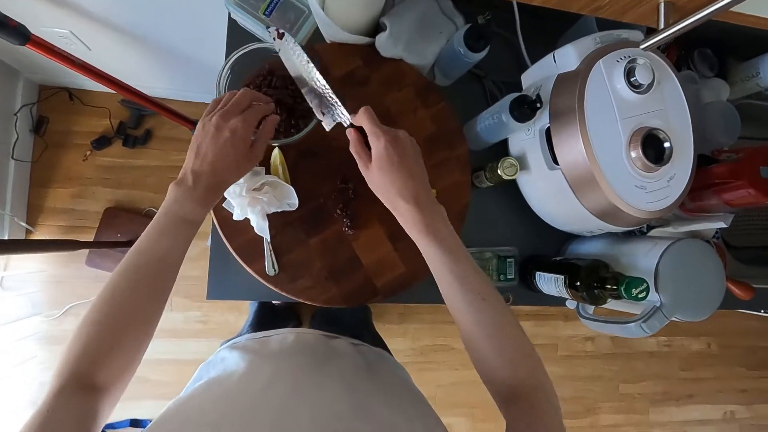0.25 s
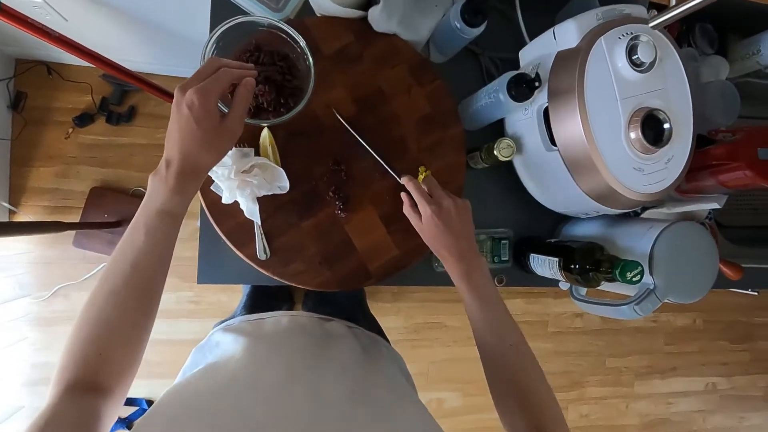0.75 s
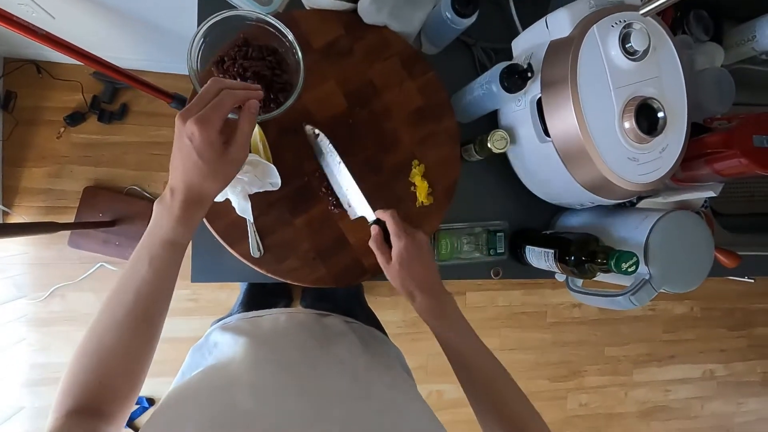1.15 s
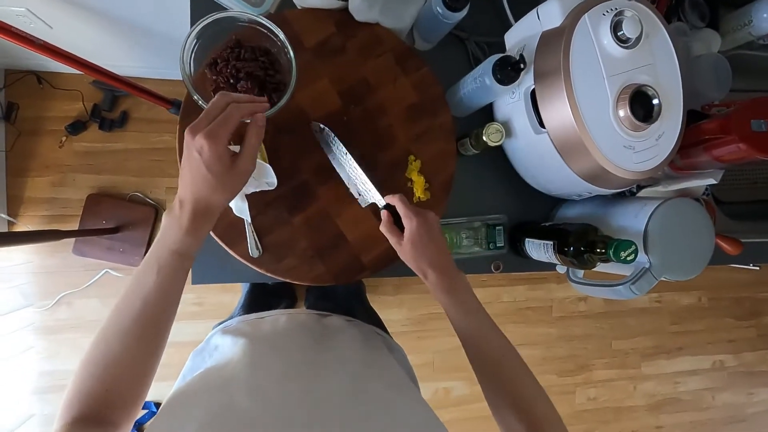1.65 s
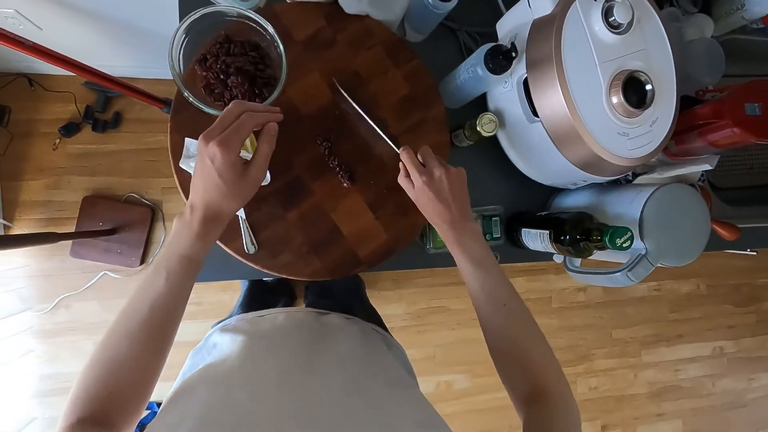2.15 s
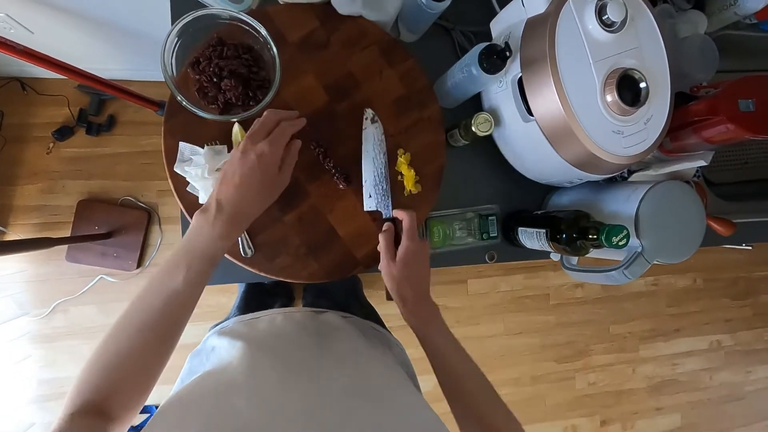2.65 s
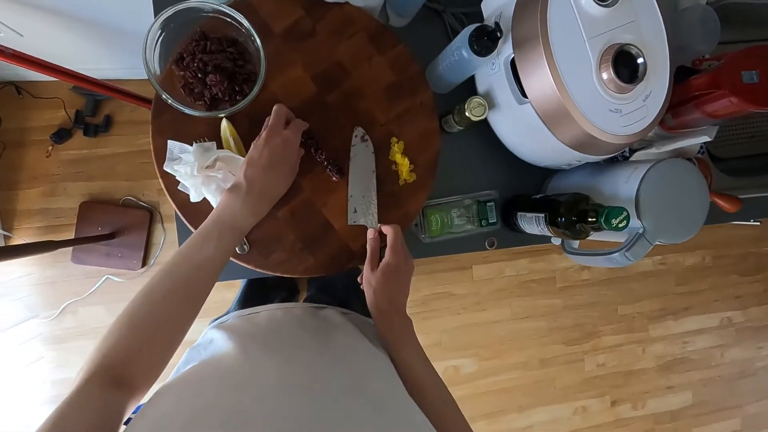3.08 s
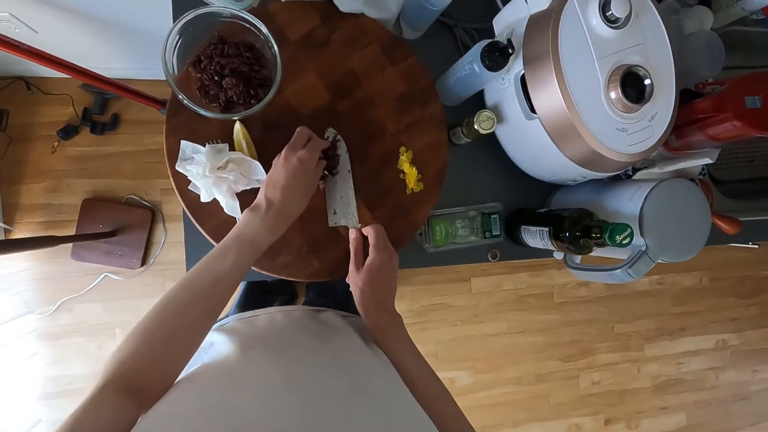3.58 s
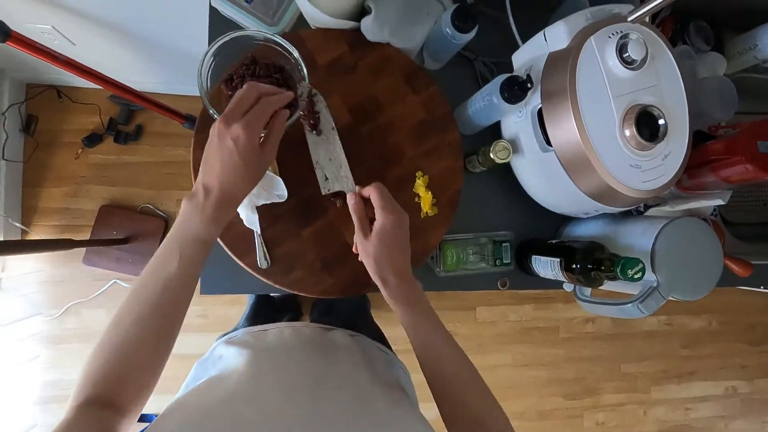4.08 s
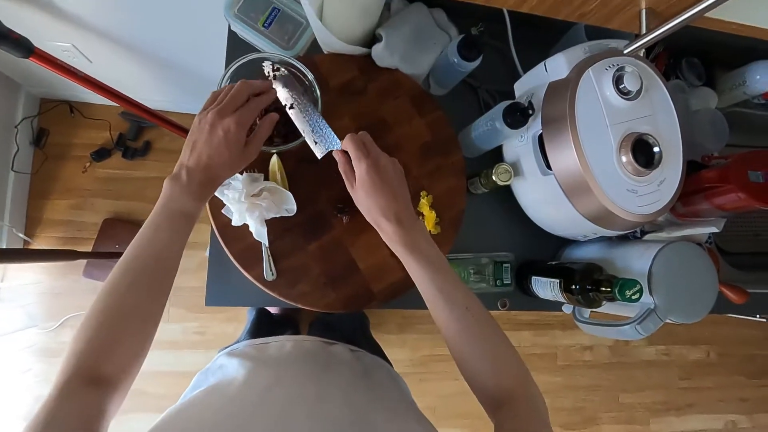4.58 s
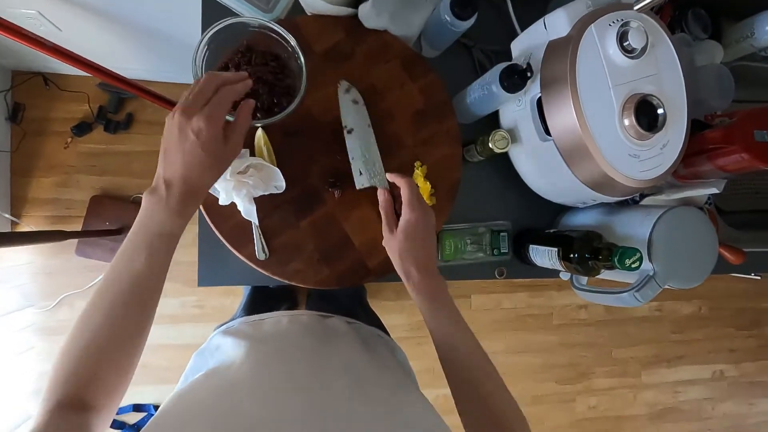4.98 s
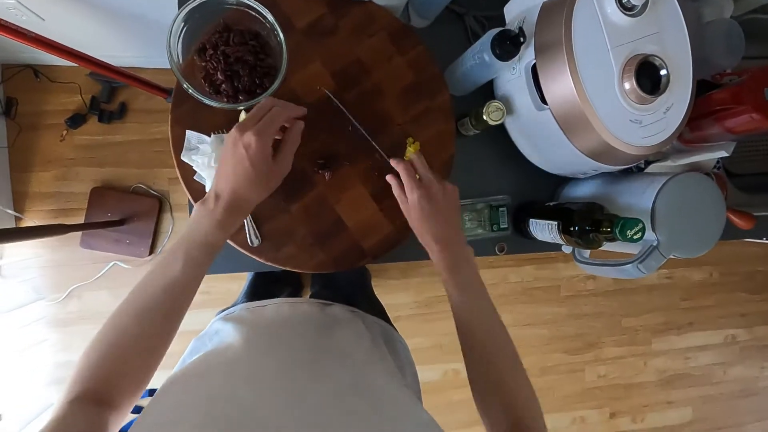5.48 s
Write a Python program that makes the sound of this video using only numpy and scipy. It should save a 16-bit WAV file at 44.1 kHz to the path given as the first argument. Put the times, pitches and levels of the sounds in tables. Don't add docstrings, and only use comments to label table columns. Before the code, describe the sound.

A chef's knife lands on a solid round wooden board, first with a knock and barely audible scrape, then two firm knocks each followed by a longer, metallic slide. Lighter taps follow, then a faint scrape, soft finger brushing and tiny glass bowl ticks, and one last light knock. Small live kitchen, steady low hum, traffic rumble, very faint bird chirps; close stereo head-worn microphone, knife slightly left.

```python
import sys
import numpy as np
from scipy import signal
from scipy.fft import rfft, irfft, next_fast_len
from scipy.io import wavfile
from scipy.ndimage import uniform_filter1d, map_coordinates

SR = 44100
rng = np.random.default_rng(int(sys.argv[2]) if len(sys.argv) > 2 else 0)


def undo_db(level):
    steps = np.asarray(level, float) / 20
    return 10 ** steps


def generate_wav(sig):
    pcm = np.round(np.clip(np.atleast_2d(sig).T, -1, 1) * 32767).astype(np.int16)
    wavfile.write(sys.argv[1], SR, pcm)


N = 252781


def chops():
    land_times = [.7638, 1.4271, 2.2138, 2.764, 2.8857, 5.2861]
    # peak in dB, blow length in seconds, bounce in dB, worktop thump in dB.
    blows = [
        (-23.5, 0.032, -10.5, -3.5),
        (-22.5, 0.027, -8, -8.5),
        (-23.5, 0.036, -14, -5.5),
        (-44.5, 0.0087, -33, -26.5),
        (-27, 0.029, -6.5, -6),
        (-35, 0.035, -6.5, -11),
    ]
    # centre in Hz, width in Hz, level in dB.
    bodies = [
        [(946, 65, 4), (1224, 15, 4), (1680, 35, -5), (2170, 270, -8), (3340, 48, -14.5), (4900, 71, -12),
         (5680, 79, -12), (7070, 28, -26)],
        [(920, 250, 11), (1317, 15.7, 16.5), (1692, 30, 8), (2570, 150, -7), (5880, 22, -20.5), (6660, 27, -4)],
        [(815, 210, 4.5), (1085, 12, 0.5), (1250, 190, 2), (2005, 94, 7), (5730, 11, 0), (6970, 54, -13)],
        [(970, 130, 4), (3000, 120, -8), (5600, 130, -20), (6060, 89, -14)],
        [(1308, 27, 4), (1550, 7.7, 9), (2300, 77, -1.5), (3200, 25, -15), (4940, 28, -21), (5660, 24, -13),
         (7270, 35, -24)],
        [(860, 85, -9), (1437, 50, 6.5), (1810, 46, -11), (2286, 40, 5), (2550, 86, -0.5), (3380, 330, -7),
         (4550, 500, -18), (7240, 180, -12.5)],
    ]
    # frequency in Hz, density in dB per Hz.
    colours = [
        [(88, -66), (150, -18), (928, -9), (1550, -1.5), (1870, -3.5), (2950, -16), (5020, -27), (14000, -53)],
        [(88, -16.5), (150, 10), (725, -10), (1380, 10), (3250, -11.5), (3570, -18.5), (7070, -15.5),
         (14000, -54.5)],
        [(88, -35), (150, -8), (672, -4.5), (1870, 1.5), (3440, -19.5), (5740, -31), (6310, -26), (14000, -49)],
        [(470, -40), (800, 0), (2930, -18.5), (3950, -42), (5380, -16.5), (7000, -50), (9100, -82.5),
         (15400, -120)],
        [(290, -91), (500, 7), (1550, -0.5), (1830, -45), (2220, 6.5), (2820, -5), (6970, -9), (14000, -75)],
        [(410, -40), (700, 2), (2010, -2), (2330, 1), (2850, -13), (7390, -27), (14000, -83)],
    ]
    # modes over the knock in dB, share reaching the walls in dB,
    # flight before the bounce in seconds.
    balances = [(1, -7.5, .019), (0, -5.5, .016), (-4, -5.5, 0.032), (-3, -2, .006), (2, -6, .017),
                (6.5, -5, 0.013)]
    # centre in Hz, width in Hz, level in dB.
    worktop = [(174, 54, 3), (316.5, 33, 4.5), (503, 54, 9.5)]
    bounce_hz = 2515
    near_share = 0.45

    out = np.zeros((2, N + SR))
    t = np.arange(SR // 8) / SR
    for s, blow, body, colour, balance in zip(land_times, blows, bodies, colours, balances):
        db, length, bounce_db, thump_db = blow
        ring_db, room_db, flight = balance
        contact = (1 - np.exp(-t / 0.0006)) * undo_db(-60 * t / max(length, 0.003))
        bounce = burst(np.roll(contact, round(flight * SR)))
        bounce = filtered(bounce, lambda hz: 1 / (1 + 1j * hz / bounce_hz) ** 2)
        force = burst(contact) + undo_db(bounce_db) * bounce

        damped = [(hz, np.hypot(width, 70), level) for hz, width, level in body]
        ring = filtered(filtered(force, modes(damped, widen=0.67)), rolled_off(body))
        ring = undo_db(ring_db) * unit(ring)
        thump = filtered(filtered(force, modes(worktop, widen=0.89)), rolled_off(worktop))
        knock = unit(filtered(force, causal(colour + [(17000, -100)])))
        hit = knock + ring + undo_db(thump_db + 2.5) * unit(thump)
        feed = undo_db(room_db) * (hit - near_share * ring)

        i = round(s * SR)
        out[:, i:i + len(t)] += undo_db(db + 1.0) * np.array([hit, feed]) / np.abs(hit).max()
    return out[:, :N]


def strokes():
    # time in seconds, speed as blade hiss in dB, pressure as board rub in dB.
    motions = [
        [(0.875, -75, -75), (0.887, -66, -88), (0.907, -59, -59.5), (0.935, -57, -58.5), (0.953, -67, -75),
         (0.965, -80, -82)],
        [(1.475, -70.5, -63.5), (1.493, -62.5, -65), (1.527, -40.5, -48.5), (1.549, -38, -47.5),
         (1.601, -35, -56.5), (1.617, -42.5, -45.5), (1.629, -40, -51.5), (1.69, -55, -45.5), (1.7, -69, -58)],
        [(2.235, -61, -54), (2.263, -51, -57), (2.285, -51, -63.5), (2.305, -44, -53), (2.395, -40, -51),
         (2.403, -40.5, -55), (2.411, -44.5, -45.5), (2.443, -43, -39), (2.5, -60, -62)],
        [(3.2, -79, -91), (3.222, -66, -68), (3.236, -56.5, -59), (3.252, -56.5, -66), (3.264, -57.5, -60.5),
         (3.316, -66, -74), (3.37, -76, -64)],
    ]
    # start in seconds, end in seconds.
    contacts = [(.875, .965), (1.475, 1.7), (2.235, 2.5), (3.2, 3.37)]
    # centre in Hz, width in Hz, level in dB.
    first_strokes = [
        [[(5500, 32, 6), (6500, 50, -2), (7720, 32, -3), (8650, 80, -10), (9460, 51, -4), (11200, 30, -11),
         (13500, 31, -21), (14400, 40, -20)], [(4200, 130, -21), (5330, 31, 4), (5910, 33, -3), (7010, 50, -2),
         (8400, 100, -14), (8630, 100, -7), (9450, 50, -13), (11700, 77, -15)]],
        [[(3940, 73, -11.5), (4810, 32, 3), (5090, 24, -14), (5920, 32, -2.5), (6780, 36, -7), (6960, 33, -8),
         (7670, 30, -2), (8600, 30, -12), (10380, 32, -15), (11200, 60, -21)], [(4937, 45, -1), (5990, 120, -6),
         (6800, 59, -10), (7020, 26, -3.5), (7710, 30, -2.5), (8910, 130, -1), (10220, 43, -10),
         (11370, 39, -13.5), (11700, 40.8, -11.5), (12200, 51, -18), (12600, 36, -19.5)], [(3950, 25, -14.5),
         (4750, 37, -0.5), (5800, 86, -0.5), (6660, 59, -9), (7120, 46, -1.5), (7800, 66, -11),
         (8360, 38, -4.5), (11400, 30, -17), (12100, 41, -18), (12800, 110, -23.5), (13700, 36, -25)],
         [(4800, 67.2, -1), (6010, 35, -4), (6980, 60.4, -3.5), (7690, 66, -2), (8230, 25, -7.5),
         (8800, 42, -6), (10140, 26, -15), (11140, 44, -18), (12300, 36, -23), (13600, 33, -24)]],
    ]
    # centre in Hz, width in Hz, level in dB.
    last_strokes = [
        [[(4460, 66, -14), (5290, 36.7, -7.5), (5500, 36, -5.5), (7110, 60, -0.5), (7570, 55, 1.5),
         (8120, 42, -11), (8840, 35, -11), (10000, 62, -12), (10200, 37, -17), (11500, 45, -19)],
         [(4380, 100, -10), (5400, 74, -2), (5610, 88, -7), (6100, 34, -11.5), (6940, 110, -5.5),
         (7800, 80, -1), (8390, 33, -1), (9520, 96, -6.5), (11700, 35, -12), (12200, 32, -14),
         (13500, 37, -25.5)], [(3080, 23, -19), (4480, 120, -4.5), (4600, 25, -11.5), (5470, 30, -14),
         (6370, 35, -8.5), (7120, 81, 1), (7600, 68, 1), (8400, 51, -10.5), (8820, 47, 0), (10100, 32, -11.5),
         (11770, 32, -15)], [(3210, 40, -11.5), (4250, 60, 3.5), (5370, 48, -5), (6970, 36.8, -0.5),
         (7200, 50, 1.5), (7540, 50, -2.5), (8740, 66, -18.5), (9910, 34, -20.5), (11600, 130, -25),
         (14100, 44, -29)], [(3280, 43, -3), (4370, 36, 2), (5390, 67, -9), (5940, 33, 7.5), (7310, 42, -5),
         (7680, 66, -11), (7700, 26, -8), (9880, 32, -20.5), (11970, 47, -22), (14000, 43, -27.5)]],
        [[(3537, 27, 3.5), (4900, 50, -3), (6240, 43, -3), (6800, 60, -4), (7700, 43, -7), (10480, 60, -18),
         (11860, 200, -20)], [(3520, 67, -3), (4850, 90, -8), (6100, 78, -6), (6850, 46, 0), (9800, 53, -13),
         (11770, 120, -14), (13400, 190, -32)]],
    ]
    # centre in Hz, width in Hz, level in dB.
    rubbed = [
        [[(2266, 40, 0)], [(2260, 51, 0)]],
        [[(969, 95, -13), (1677, 23, 1.5), (2490, 60, -18)], [(950, 35, -9.5), (1656, 32, 3),
         (2030, 72, -14.5)], [(924, 66, -5), (1670, 57, 3.5), (2080, 55, -4), (2380, 90, -6.5)]],
        [[(958, 100, -4), (1470, 26, 2), (2245, 54, -2)], [(1530, 31, -7), (1890, 56, -3.5), (2297, 54, 4)],
         [(1520, 70, -10.5), (2210, 112, -6)]],
        [[(2370, 140, 0)], [(2170, 120, 0)]],
    ]
    # moment of each set in seconds,
    # tilt of the hiss in dB per octave, hiss over the modes in dB.
    slides = [([0.79, 0.85], 4, 2.2), ([1.52, 1.565, 1.61, 1.665], 1, -3),
              ([2.265, 2.314, 2.365, 2.425, 2.48], 0.79, -2), ([3.26, 3.33], -7, -3.5)]
    rub_levels = [-9, -10, -6, 0]
    # frequency in Hz, density in dB per Hz.
    fibres = [(1800, -51.5), (2600, -14), (4500, -9), (6200, -4.5), (8000, 0), (9500, -7.5), (13500, -20.5),
              (15600, -31.5)]
    # frequency in Hz, density in dB per Hz.
    rub_colour = [(500, -70.5), (800, -25.5), (1500, 16), (2600, 12.5), (4000, -47)]
    lift_s = 0.016

    out = np.zeros(N)
    table = zip(motions, contacts, first_strokes + last_strokes, rubbed, slides, rub_levels)
    for rows, (start, end), blade, board, (moments, tilt_db, hiss_db), rub_db in table:
        part = slice(round(start * SR) - SR // 10, round(end * SR) + SR // 10)
        speed_db, press_db = [curve[part] for curve in curves(rows)]
        t = np.arange(N)[part] / SR
        touch = np.clip(np.minimum(t - start, end - t) / lift_s + 1, 0, 1) ** 2
        grains = patches((len(t),), patchy_db=2.5)

        turns = [np.sqrt(np.interp(t, moments, only)) for only in np.eye(len(moments))]
        blade_ring = sum(gain * sung(grains, rings) for gain, rings in zip(turns, blade))
        hiss = filtered(grains, lambda hz: undo_db(along(fibres, hz) + tilt_db * np.log2(hz + 1)))
        steel = blade_ring + undo_db(hiss_db) * unit(hiss)
        board_ring = sum(gain * sung(grains, rings) for gain, rings in zip(turns, board))
        rub = filtered(grains, lambda hz: undo_db(along(rub_colour, hz)))
        wood = board_ring + undo_db(rub_db) * unit(rub)
        out[part] += touch * (undo_db(speed_db - 1.0) * unit(steel) + undo_db(press_db - 1.5) * unit(wood))
    return out


def ticks():
    # start in seconds, peak in dB, contact length in seconds.
    touches = [
        (0.243, -51.5, 0.029),
        (1.43, -43.5, 0.028),
        (2.388, -31.5, 0.049),
        (2.437, -40.5, 0.086),
        (2.887, -42.5, 0.012),
        (2.903, -43.5, 0.013),
        (4.55, -54.5, 0.02),
        (4.836, -57.5, 0.035),
        (5.288, -65, 0.026),
    ]
    # centre in Hz, width in Hz, level in dB.
    rung = [
        [(5870, 170, -17), (6800, 460, 8), (6980, 37, 17), (8450, 200, -7), (11800, 200, -18),
         (12100, 200, -17)],
        [(1680, 12, 0), (1770, 37, -13)],
        [(7140, 81, -0.5), (7220, 160, -15.5)],
        [(916, 23, 0)],
        [(2260, 20, 3.5), (3330, 21, 10), (4640, 10, 4), (5400, 27, -7), (5900, 20, 8), (6770, 21, 5.5),
         (7060, 18, 4), (8080, 180, -6), (11800, 460, -16)],
        [(1200, 20, 19), (1490, 10, 21.5), (2390, 20, 3), (3280, 9.9, 4), (4700, 11, 4)],
        [(5930, 200, -7), (7100, 90, -2.5), (7600, 43, 4), (8800, 130, -8), (11500, 900, -25)],
        [(4930, 590, -6.5), (5940, 180, 1), (6540, 590, -14), (6950, 14, 4), (11700, 900, -31)],
        [(7100, 25, 1), (7650, 40, -3)],
    ]
    out = np.zeros(N + SR)
    t = np.arange(SR // 3) / SR
    for (s, db, length), rings in zip(touches, rung):
        force = burst(t / length * undo_db(-60 * t / length))
        resonance, rolloff = modes(rings, widen=1), rolled_off(rings)
        ring = filtered(force, lambda hz: resonance(hz) * (1j * hz / (4000 + 1j * hz)) ** 2 * rolloff(hz))
        i = round(s * SR)
        out[i:i + len(t)] += undo_db(db + 3.3 * wobble(120)[:len(t)]) * ring / np.abs(ring).max()
    return out[:N]


def fingers():
    # loudest moment in seconds, level in
    # dB, rise in seconds, fall in seconds.
    brushes = [(.77, -68, .002, 0.068), (2.89, -73.5, .002, 0.2), (3.4, -77, 0.19, .25),
               (3.8, -88.5, 0.091, 0.14), (4.55, -74, 0.054, 0.047), (4.845, -93, .05, .05),
               (5.292, -70.5, .002, 0.093), (5.73, -77, .03, .03)]
    # frequency in Hz, density in dB per Hz.
    skin_colour = [(3000, -24), (6000, 0.5), (8500, -3.5), (10000, -10.5), (12500, -11), (13200, -19),
                   (14500, -71)]
    fade_db = 18.5
    skin = unit(filtered(rng.standard_normal(N), lambda hz: undo_db(along(skin_colour, hz))))
    skin = skin * undo_db(1.2 * wobble(64))
    out = np.zeros(N)
    for s, db, rise, fall in brushes:
        out += undo_db(db - fade_db * np.abs(arch(s, rise, fall))) * skin
    return out


def ears(x):
    # frequency in Hz, left over right in dB.
    lean = [(200, -1), (700, 0.5), (1300, 2.5), (2600, 1), (5000, 1), (8000, 4), (10000, 0.9), (13000, 1.5)]
    # frequency in Hz, share of the direct sound.
    reflection = [(500, 0.18), (1200, 0.13), (3300, 0.34), (5500, .2), (8000, 0.056), (10000, .1),
                  (13000, 0.51)]
    delays = np.array([[0.0009], [0.0013]])

    def response(hz):
        echo = 1 + along(reflection, hz) * np.exp(-2j * np.pi * hz * delays)
        return undo_db(along(lean, hz) * [[0.5], [-0.5]]) * echo
    return filtered(x, response)


def kitchen(x):
    # frequency in Hz, t60 in seconds.
    decay = [(200, 0.15), (1000, 0.45), (4000, 0.47), (8000, 0.36), (14000, 0.26)]
    hz, t, z = signal.stft(rng.standard_normal((2, SR // 2)), SR, nperseg=256)
    a, b = signal.istft(z * undo_db(-60 * t / along(decay, hz)[:, None]), SR, nperseg=256)[1]
    tail = rfft(np.array([a + 0.75 * b, a - 0.08 * b]))
    near, wide = (uniform_filter1d(np.abs(tail) ** 2, size=k, axis=1) for k in (12, 300))
    tail = irfft(tail * np.sqrt(np.abs(wide / near)))
    tail = tail * np.clip(np.linspace(4, -1, tail.shape[1]), 0, 1) ** 2
    late = np.pad(x, (130, 0))[None]
    return signal.fftconvolve(late, tail / np.linalg.norm(tail[0]), axes=1)[:, :N]


def bird():
    # top of the arch in seconds, climb in seconds, fall in seconds, top in Hz, level in dB.
    notes_sung = [(.541, 0.0066, 0.0046, 4700, -80), (.552, 0.02, 0.023, 3700, -84.5),
                  (.607, 0.0077, 0.012, 3850, -83), (2.804, .003, 0.019, 3900, -84),
                  (3.66, .003, 0.028, 4400, -86), (4.8, .035, .003, 4900, -87.5),
                  (4.823, 0.015, 0.016, 4400, -72.5), (4.867, 0.013, 0.013, 3660, -74),
                  (4.893, 0.012, 0.002, 5000, -80), (4.924, 0.0069, .004, 3700, -82)]
    rest_hz = 3300
    out = np.zeros(N)
    t = np.arange(N) / SR
    for s, climb, fall, top_hz, db in notes_sung:
        hz = top_hz - (top_hz - rest_hz) * np.minimum(((t - s) / max(climb, fall)) ** 2, 1.2)
        half = 0.6 * (climb + fall)
        swell = np.clip(1 - arch(s + (fall - climb) / 2, half, half) ** 2, 0, 1)
        out += swell * undo_db(db + 8.5 + 1.8 * wobble(150)) * np.sin(2 * np.pi * np.cumsum(hz) / SR)
    return out


def hum():
    # frequency in Hz, width in Hz, level in dB.
    motor_lines = [(112.8, 5, -57.5), (150.76, 1.97, -55.5), (228.4, 8.24, -57.5), (299.3, 7.3, -56),
                   (331.2, 8.86, -61), (357.5, 3.36, -58.5), (421, 4.3, -64.5)]
    t = np.arange(N) / SR
    out = np.zeros(N)
    for hz, width, db in motor_lines:
        drift = 2 * np.pi * (hz * t + np.cumsum(0.2862 * width * wobble(6)) / SR + rng.random())
        fuzz = unit(filtered(rng.standard_normal(N), modes([(hz, width, 0)], widen=0.48)))
        out += undo_db(db) * unit(np.sqrt(2) * np.sin(drift) + 0.0064 * width ** 2 * fuzz)
    return filtered(out, rolled_off(motor_lines))


def street():
    # time in seconds, effort in dB.
    load = [(0, -58), (.14, -50.5), (1.0, -50), (1.43, -48.5), (1.72, -49.5), (1.86, -52.5), (2.3, -51),
            (2.7, -51.5), (3.05, -50.5), (3.4, -50.5), (4.1, -52), (4.9, -50.5), (5.35, -52.5),
            (5.73, -54.5)]
    # time in seconds, tyre level in dB.
    nearness = [(0, -70), (.9, -64), (1.8, -72.5), (2.4, -61.5), (2.75, -70.5), (3.3, -64.5), (4.6, -62),
                (5.3, -58), (5.73, -59.5)]
    # frequency in Hz, density in dB per Hz.
    deep = [(11, -49), (18, -21.5), (43, -2.5), (75, -5), (98, -29.5), (160, -120)]
    # frequency in Hz, density in dB per Hz.
    engine = [(45, -55.5), (65, 3), (90, 20), (108, 14.5), (125, 6), (140, -51)]
    # frequency in Hz, density in dB per Hz.
    tyres = [(600, -120), (780, -4), (1000, 7), (1200, -9), (1750, -12), (2300, -19.5), (3000, -120)]
    # frequency in Hz, density in dB per Hz.
    still_air = [(115, -21), (170, -3.5), (223, -5), (307, -3.5), (391, -9), (560, -11.5), (640, -14.5),
                 (1750, -22), (2410, -33), (7600, -48), (8800, -58), (10000, -84.5), (12500, -85),
                 (13300, -120)]
    # centre in seconds, half length in seconds, firing rate in Hz, level in dB.
    surges = [(0.572, 0.092, 92, -51), (1.493, 0.13, 42, -45.5), (2.576, 0.17, 84.3, -52),
              (2.973, 0.071, 88, -55.5), (4.881, 0.078, 106.2, -48), (5.42, 0.21, 96.8, -44),
              (5.4, 0.12, 59, -49)]
    air_db, air_follows = -55, 0.28

    effort_db, tyre_db = curves(load)[0], curves(nearness)[0]
    t = np.arange(N) / SR
    low = undo_db(-2.5) * drone(deep, span=0.48) + undo_db(-3) * drone(engine, span=0.18)
    uneven_db, drift = 1.8 * wobble(13), 1.06 * wobble(11)
    revs = np.zeros(N)
    for s, half, hz, db in surges:
        swell = np.exp(-((t - s) / half) ** 2)
        revs += undo_db(db + 3.0 + uneven_db) * swell * np.sin(2 * np.pi * hz * t + drift)
    follow_db = air_follows * (tyre_db - tyre_db.mean())
    air = undo_db(air_db + 0.2 + follow_db) * rush(still_air, patchy_db=0.5)
    rolling = undo_db(tyre_db - 1.5 + 2.3 * wobble(3.92)) * rush(tyres, patchy_db=-1.0)
    return undo_db(effort_db) * low + revs + rolling + air


def drone(spectrum, span):
    x = rush(spectrum, patchy_db=0.5)
    power = uniform_filter1d(x.mean(axis=0) ** 2, size=round(span * SR))
    return unit(x / np.sqrt(np.abs(power) + 0.05))


def rush(spectrum, patchy_db):
    # frequency in Hz, correlation.
    alike = [(60, 1), (150, 0.97), (380, 0.9), (950, 0.62), (2380, 0.68), (4000, 0.45), (8000, 0.84),
             (11000, 0.4)]

    def response(hz):
        turn = np.arccos(np.clip(along(alike, hz), -1, 0.995)) / 2
        return undo_db(along(spectrum, hz)) * [np.cos(turn), np.sin(turn)]
    mid, side = filtered(patches((2, N), patchy_db), response)
    return unit(np.array([mid + side, mid - side]))


def burst(envelope):
    x = rng.standard_normal(len(envelope)) * envelope
    for _ in range(4):
        z = rfft(x)
        x = irfft(z / (np.abs(z) + 1e-12), len(x))
        x *= envelope / np.sqrt(np.abs(uniform_filter1d(x ** 2, size=40)) + 1e-20)
    return x


def patches(size, patchy_db):
    z = signal.stft(rng.standard_normal(size), nperseg=512)[2]
    field = uniform_filter1d(rng.standard_normal(z.shape[-2:]), size=6, axis=0)
    field = uniform_filter1d(field, size=12, axis=1)
    return signal.istft(z * undo_db(patchy_db * unit(field)), nperseg=512)[1][..., :size[-1]]


def sung(drive, rows):
    each = [(-1) ** k * filtered(drive, modes([row], widen=0.81)) for k, row in enumerate(rows)]
    each = np.array(each)
    power = np.abs(uniform_filter1d(each ** 2, size=500, axis=1))
    power = power / np.mean(each ** 2, axis=1, keepdims=True)
    return unit(np.sum(each / (power + 0.15) ** 0.3, axis=0))


def modes(rows, widen):
    def response(f):
        total = 0
        for k, (centre, width, db) in enumerate(rows):
            damping = 1j * f * width * widen
            total = total + (-1) ** k * undo_db(db) * damping / (centre * centre - f * f + damping)
        return total
    return response


def rolled_off(rows):
    return lambda hz: 1 / (1 + 1j * hz / (1.56 * rows[-1][0])) ** 4


def causal(points):
    def response(hz):
        cepstrum = irfft(np.log(undo_db(np.maximum(along(points, hz), -100))))
        half = len(cepstrum) // 2
        return np.exp(rfft(np.r_[cepstrum[0], 2 * cepstrum[1:half], np.zeros(half)]))
    return response


def filtered(x, response):
    m = 2 * next_fast_len(x.shape[-1] // 2 + 4096)
    return irfft(rfft(x, m) * response(np.fft.rfftfreq(m, 1 / SR)), m)[..., :x.shape[-1]]


def along(points, hz):
    f, v = np.transpose(points)
    return np.interp(np.log(hz + 1), np.log(f + 1), v)


def curves(rows):
    s, *cols = np.transpose(rows)
    return [np.interp(np.arange(N) / SR, s, c) for c in cols]


def wobble(rate):
    knots = rng.standard_normal(int(N * rate / SR) + 4)
    return map_coordinates(knots, [np.arange(N) * rate / SR])


def arch(top, before, after):
    t = np.arange(N) / SR - top
    return t / np.where(t < 0, max(before, 0.001), max(after, 0.001))


def unit(x):
    return x / np.sqrt(np.mean(x ** 2) + 1e-20)


def scene():
    # frequency in Hz, left over right in dB.
    window = [(150, 0), (400, .8), (1000, 3), (3500, 3), (5000, .8), (12000, 6)]
    (blows, feed), slides, far = chops(), strokes(), bird()
    taps = ticks() + fingers()
    wet = kitchen(feed)
    wet = wet + undo_db(-8.5) * kitchen(slides * (0.25 + wobble(260)) + undo_db(-2.5) * taps)
    wet = wet + undo_db(-4.5) * kitchen(far * wobble(150))
    background = filtered(hum() + street(), lambda hz: undo_db(along(window, hz) * [[0.5], [-0.5]]))
    return ears(blows + slides + taps) + far + wet + background


def top_cut(x):
    return signal.sosfilt(signal.butter(12, 15680, fs=SR, output="sos"), x)


def record(dry):
    # frequency in Hz, lead in radians.
    lead = [(100, -0.1), (750, -.2), (1500, -.4), (2600, -0.8), (3300, -.6), (4200, -.35), (6500, -.1),
            (8000, 0)]
    ports = filtered(dry, lambda hz: np.exp(1j * along(lead, hz) * [[0.5], [-0.5]]))
    held = ports / (1 + np.abs(ports / 0.11) ** 4) ** (1 / 4)
    limited = filtered(held, lambda hz: hz < 15700)
    return top_cut(limited)


dry = scene()
out = record(dry)
generate_wav(out)
```